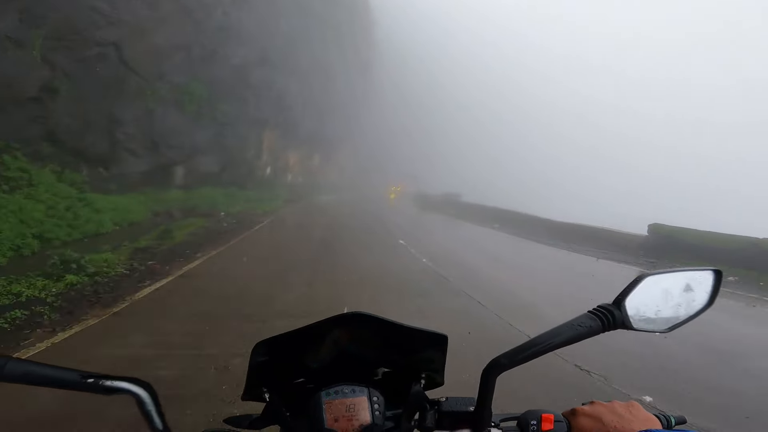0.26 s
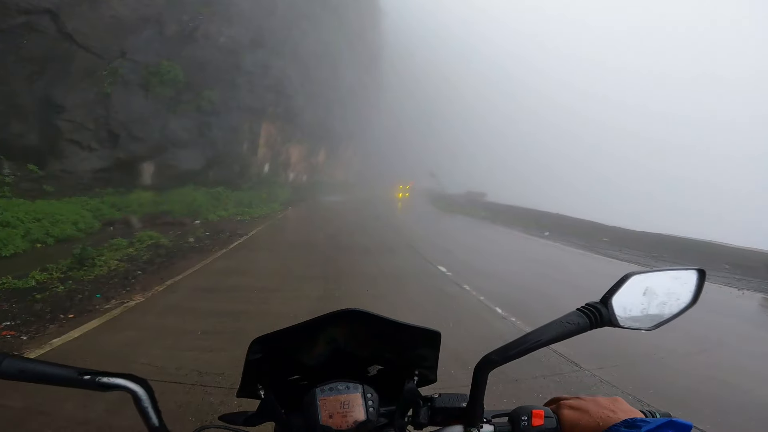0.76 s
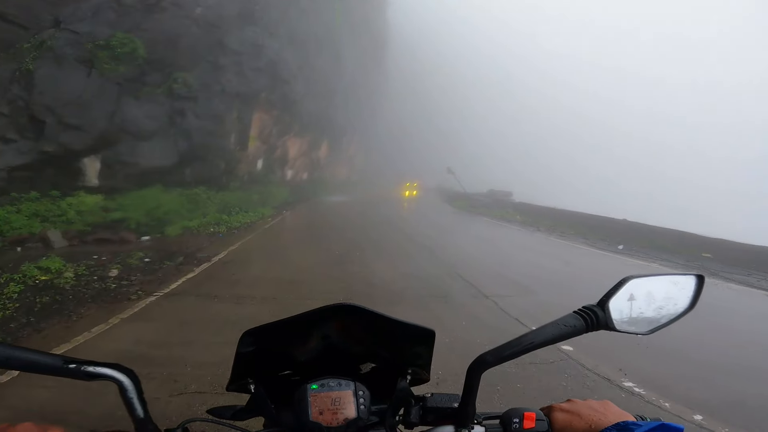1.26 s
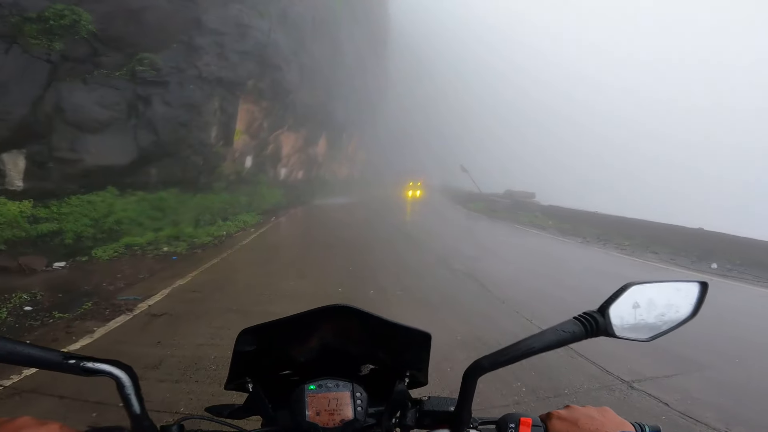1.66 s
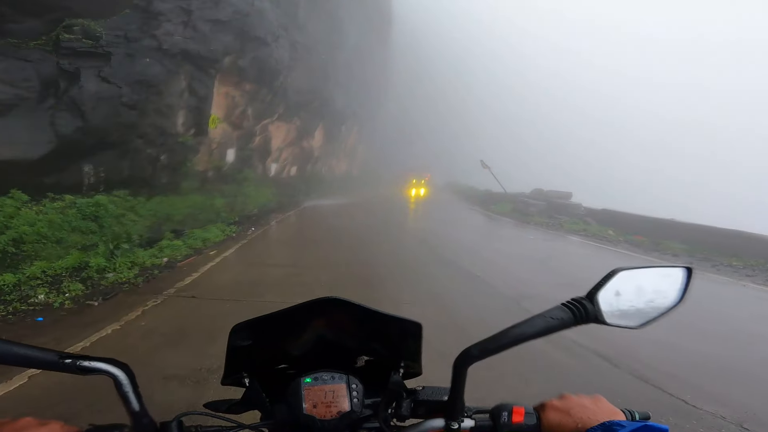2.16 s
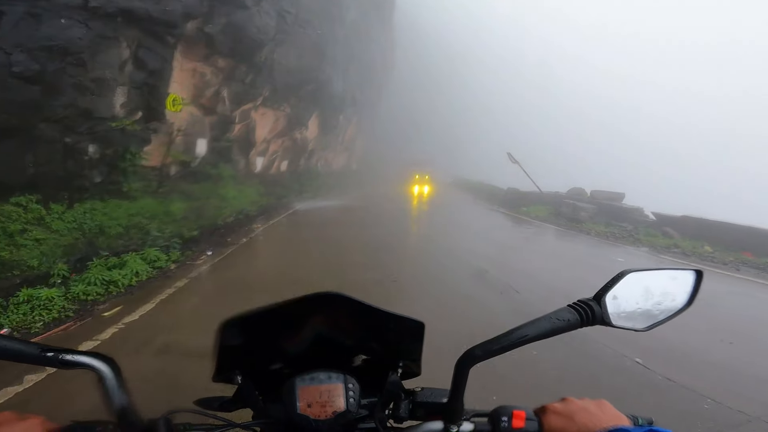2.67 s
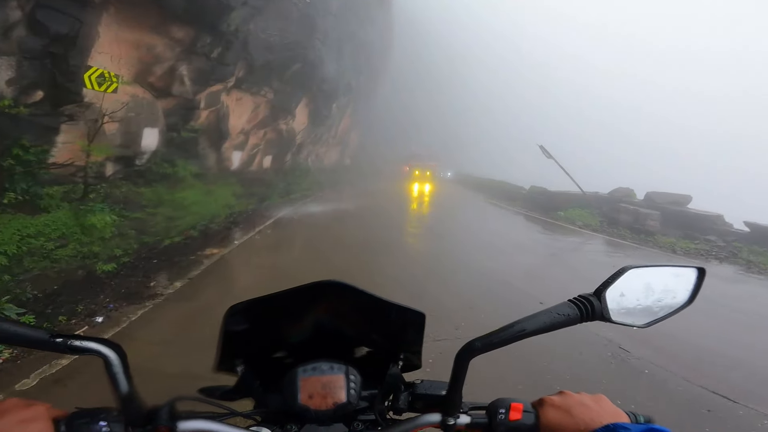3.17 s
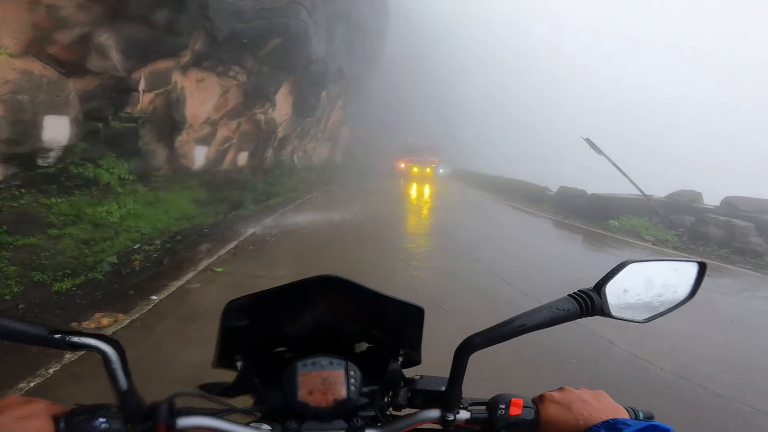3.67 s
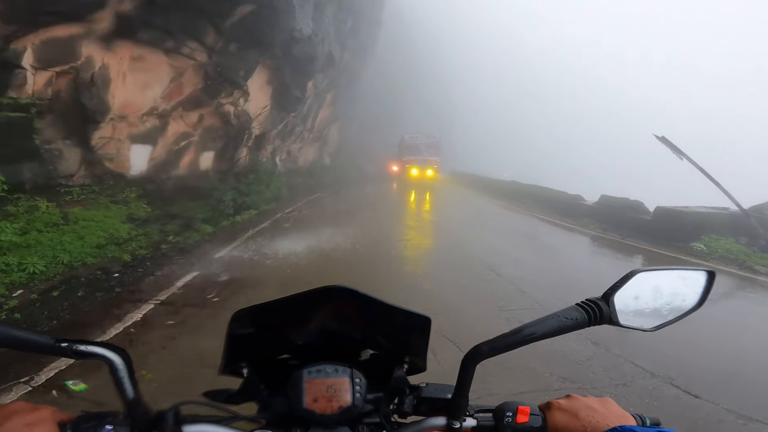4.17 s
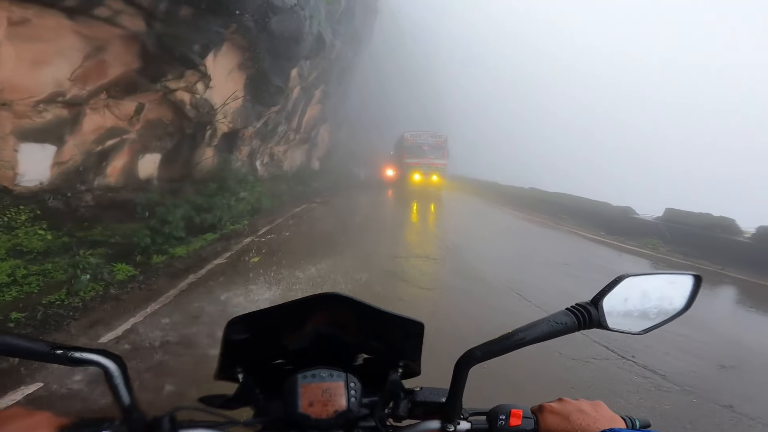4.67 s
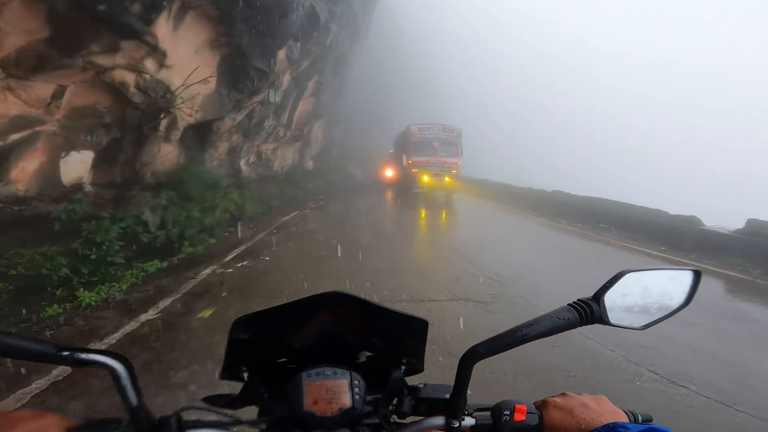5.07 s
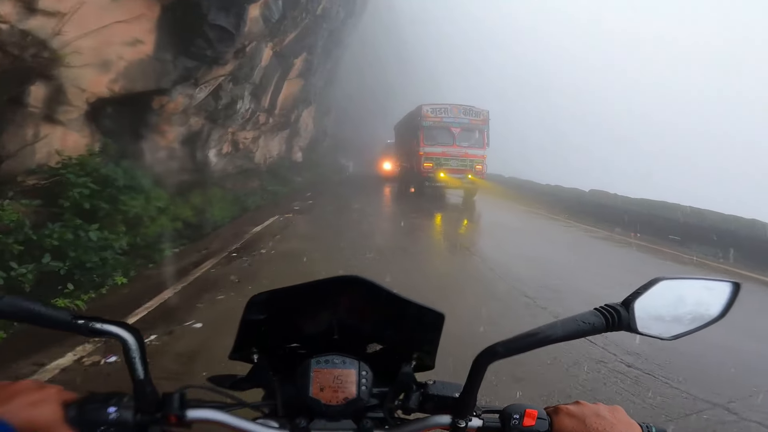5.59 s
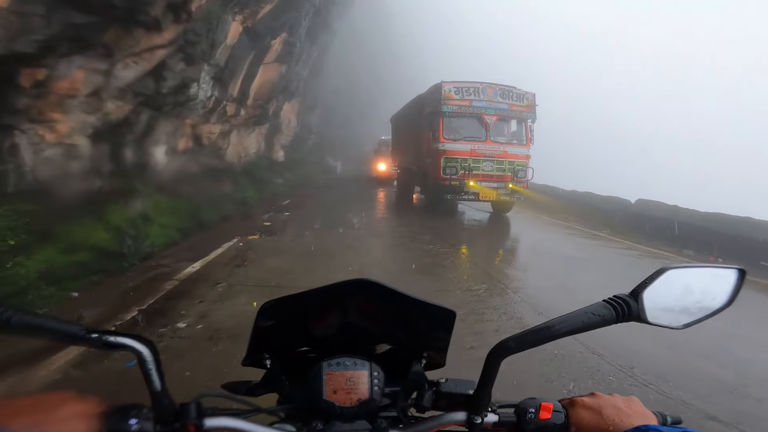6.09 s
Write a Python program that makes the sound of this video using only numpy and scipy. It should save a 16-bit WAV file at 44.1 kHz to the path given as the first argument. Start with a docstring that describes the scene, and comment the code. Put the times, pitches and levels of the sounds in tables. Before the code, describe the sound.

A single-cylinder motorcycle chugs near idle on a wet road in buffeting wind, water drops clatter on the camera, and an oncoming truck's growl swells.

```python
"""A wet road under a dripping rock face, heard from the camera of a motorcyclist rolling near idle.
Each firing of the single cylinder rings the exhaust, and wind buffets the two microphone ports.
Filtered noise makes the tyres and the falling water, which hisses nearer until it is passed; its drops
ring the camera housing. A far reed horn beeps twice, the first beep with a softer lead-in, and the growl
and rush of an oncoming truck swell. A thin high whistle comes and goes."""
import sys
import numpy as np
from scipy import signal
from scipy.fft import rfft, irfft, next_fast_len
from scipy.io import wavfile
from scipy.ndimage import uniform_filter1d, map_coordinates

SR = 44100
rng = np.random.default_rng(int(sys.argv[2]) if len(sys.argv) > 2 else 0)


def decibels_to_gain(level_db):
    """Convert a level in decibels to a linear amplitude gain (20 dB per decade)."""
    exponent = np.asarray(level_db, float) / 20
    return 10 ** exponent


def dump_mix(stems):
    """Bounce the given channels to the path in sys.argv[1] as a 16-bit WAV at rate SR."""
    frames = np.atleast_2d(stems).T  # one column per channel
    limited = np.clip(frames, -1, 1)  # hard clip at full scale
    pcm = np.round(limited * 32767).astype(np.int16)
    wavfile.write(sys.argv[1], SR, pcm)


N = 279594  # samples

# The two microphone ports. Each row: frequency in Hz, left-right correlation from 0 to 1.
PORT_LIKENESS = [(100, 1), (520, 1), (890, 0.92), (1500, 0.55), (2600, 0.2), (8000, 0.1)]
WIND_LIKENESS = [(20, .95), (100, .92)]
# Balance of the ports. Each row: frequency in Hz, left over right in dB.
PORT_BALANCE = [(60, 1.5), (150, -1), (390, 0), (1010, 2), (2600, 2.5)]
PORT_LAG_S = 1.25e-4  # the right port hears a little later

# Far horn. Each row: start in seconds, time held in seconds, level in dB.
HORN_BEEPS = [(3.8, .05, -40), (3.86, .1, -32), (4.04, .065, -32.5)]
# Horn overtones; a second, lower trumpet gives the multiple between.
# Each row: multiple of the pitch, level in dB.
HORN_OVERTONES = [(1, -5), (2, 0), (2.53, -10), (3, -8), (4, -11), (5, -26), (6, -24), (8, -24)]
HORN_HZ, HORN_ATTACK_S, HORN_DROP_DB_PER_S = 489.5, .012, 170

# Thin whistle before its random wavering. Each row: time in seconds, rms level in dB.
WHISTLE_LEVEL = [(.3, -82), (.36, -69), (.46, -62), (.54, -74), (.66, -66), (.76, -73), (1, -70),
                 (1.08, -74), (1.22, -64), (1.35, -68), (1.42, -78), (1.65, -78), (1.8, -67), (1.9, -68),
                 (2, -61), (2.08, -69), (2.25, -78), (4.2, -76), (4.5, -90)]
WHISTLE_HZ = 11312

# Oncoming truck's body resonances. Each row: centre in Hz, width in Hz, level in dB.
TRUCK_RESONANCES = [(112.7, 32, 1.5), (328, 63, -0.5), (465, 93, -5), (811, 65, -7)]
TRUCK_PASS_S, CLOSING_M_PER_S, TRUCK_SIDE_M = 6.91, 6.87, 13.6
TRUCK_FIRINGS_HZ = 46.84  # mean rate
TRUCK_GROWL_DB, TRUCK_ROAR_DB, TRUCK_RUSH_DB = -24, -13.5, -29.5  # as heard from 10 m
FADE_DB = 4  # how deep the resonances fade

# Spectra of the road's roar and rush. Each row: frequency in Hz, relative density in dB.
ROAR_SPECTRUM = [(40, -12), (80, 0.5), (200, -6.5), (450, -5), (700, -8), (1000, -16), (1400, -24),
                 (2500, -68), (5000, -130)]
RUSH_SPECTRUM = [(500, -12), (1000, 5), (1500, 1.5), (2000, -2), (2600, -8), (3400, -15), (4500, -20),
                 (7000, -21), (10000, -120)]
OWN_ROAR_DB = -33.5  # the bike's own tyres
PUDDLE_S, PUDDLE_WIDTH_S, PUDDLE_DB = 5.9, 0.78, -33  # the tyres cross the water lying under the fall

# Wind on the camera. Each row: time in seconds, slow surge level in dB, eddy level in dB.
WIND_LEVELS = [(0, -7.5, -20.5), (.3, -14.5, -26), (.7, -11.5, -25.5), (.95, -13.5, -40),
               (1.55, -10.5, -34.5), (2, -12.5, -30.5), (2.4, -13.5, -18), (2.7, -10.5, -24.5),
               (3.1, -13, -17.5), (3.4, -12.5, -25.5), (4, -15, -18.5), (4.65, -14, -25), (5.05, -11, -24),
               (5.5, -14, -38), (5.9, -19.5, -19.5), (6.34, -17, -19)]
# Spectra of surge (before it flattens) and eddies. Each row: frequency in Hz, relative density in dB.
SURGE_SPECTRUM = [(1, 0), (4, -3.5), (15, -12.5), (35, -10.5), (44, -13.5), (70, -44), (140, -140)]
EDDY_SPECTRUM = [(20, -29), (50, 4), (75, 6.5), (120, -0.5), (200, -6.5), (400, -10.5), (800, -51),
                 (1600, -140)]

# Spectra of the falling water, body and finest part. Each row: frequency in Hz, relative density in dB.
HISS_SPECTRUM = [(2500, 4), (4000, -15), (5500, -3), (7000, 2.5), (9000, 2.5), (11000, -5.5), (13000, -28),
                 (15500, -40), (17000, -120)]
FIZZ_SPECTRUM = [(7000, -25), (10500, 1), (12000, 0), (13500, -4), (15500, -11), (17000, -30)]
STRAY_SPECTRUM = [(3000, -30), (5000, 0), (8000, 1), (12000, -5), (16000, -25)]
FALL_PASS_S, BIKE_M_PER_S, FALL_SIDE_M = 5.41, 4.6, 6.2
HISS_DB, FIZZ_DB = -46, -57.5  # as heard from 10 m
MIST_DB_PER_M = 0.3  # fizz lost with distance beyond spreading
BEHIND_DB, TURN_S = -1, 0.044  # softer once it lies behind the rider
FALL_LEFT_DB = 4.5  # lean to each side at the nearest distance, before it falls behind
SHOWER_S, SHOWER_END_S, SHOWER_EDGE_S = 4.95, 5.45, .2  # riding through the thrown spray
SHOWER_FIZZ_DB = 6  # for a fully open shower

# Drops on the housing, relative levels.
# Each row: start in seconds, knock in dB, crack in dB, tick in dB, ring in Hz.
HOUSING_DROPS = [(0.5175, -31.5, -36, -38, 1980), (1.4142, -33, -58, -62, 1800),
                 (1.595, -23, -37, -48, 1350), (2.068, -25, -47, -50, 1310), (2.358, -47, -40, -56, 1400),
                 (2.481, -38, -44, -56, 1400), (2.544, -46, -35, -48, 1400),
                 (5.2331, -7.5, -16.5, -25, 1250), (5.2397, -10, -42, -40, 980),
                 (5.265, -19, -39, -44, 1310), (5.3078, -15, -46, -44, 1280), (5.3468, -22, -44, -46, 1270),
                 (5.3573, -16, -44, -46, 1280), (5.3843, -26, -44, -48, 1900),
                 (5.404, -8.5, -57, -31, 1840), (5.4107, -10, -31, -42, 1310),
                 (5.4212, -13.5, -28, -44, 1380), (5.454, -13, -42, -47, 1270),
                 (5.4576, -15, -40, -48, 1330), (5.484, -10, -36, -42, 1210), (5.5043, -6, -6.5, -35, 1660),
                 (5.507, -17, -30, -40, 1690), (5.54, -18, -25, -26, 2000), (5.5545, -15, -27, -29, 1350),
                 (5.5657, -13, -28, -36, 1500), (5.5747, -16.5, -38, -42, 1300),
                 (5.5898, -13, -21, -28, 1320), (5.6057, -16, -23, -32, 1390),
                 (5.617, -29, -19, -21.5, 1800), (5.6338, -12, -38, -28, 1490),
                 (5.647, -18, -24, -33, 1410), (5.6517, -11.5, -30, -24, 1440),
                 (5.6685, -35, -44, -29, 1400), (5.698, -15.5, -40, -46, 1410), (5.72, -16, -36, -32, 1340),
                 (5.7262, -13, -34, -32, 1370), (5.732, -17, -38, -32, 1200), (5.7419, -14, -31, -33, 1390),
                 (5.752, -35, -39, -26, 1390), (5.7827, -20, -29, -28, 1280), (5.7898, -30, -25, -22, 1900),
                 (5.8292, -19, -29, -35, 1410), (5.8373, -13, -33, -36, 1360),
                 (5.8463, -18, -43, -35, 1310), (5.8707, -23, -40, -38, 1400), (5.914, -25, -35, -37, 1500),
                 (5.933, -21, -33, -30, 1850), (5.9464, -15, -38, -44, 1430),
                 (5.9716, -22.5, -34, -40, 1920), (6.0287, -30, -27, -30, 1380),
                 (6.1084, -28, -34, -44, 1400)]
# Modes of the housing. Each row: multiple of the ring pitch, gain in dB, decay by 60 dB in seconds.
HOUSING_MODES = [(0.98, 5, 0.013), (0.593, 4.5, 0.0083), (1.366, 1.5, 0.0076), (1.8, -11, 0.012),
                 (0.372, -3.5, 0.014)]
SPREAD_S = .0005  # a drop flattens out, so its modes do not all start at once
# Small splashes under the fall, before random scatter. Each row: time in seconds, level in dB.
SPLASH_LEVEL = [(5.15, -34), (5.27, -37), (5.45, -40), (5.58, -30.5), (5.85, -26.5), (6.05, -38),
                (6.34, -30.5)]
# Droplets of spray ticking close on the left. Each row: start in seconds, level in dB.
LEFT_DROPLETS = [(2.109, -40), (2.138, -43), (2.566, -44), (4.0005, -29), (5.016, -25), (5.0871, -30),
                 (5.0992, -25), (5.143, -26), (5.216, -28), (5.2465, -24), (5.4276, -28), (5.5209, -40)]
# Spectra of crack, tick and droplet. Each row: frequency in Hz, relative density in dB.
CRACK_SPECTRUM = [(1500, -17), (3000, 0), (3800, -5), (4500, -1), (5200, -10.5), (6000, -15.0),
                  (8000, -12.5), (12000, -44)]
TICK_SPECTRUM = [(4500, -32), (6500, -0.5), (8500, -2.5), (11000, -3.0), (14000, -8), (16000, -18)]
DROPLET_SPECTRUM = [(5000, -30), (7500, 0), (10500, 2), (13500, -16), (16000, -30)]

# Exhaust pipe and silencer resonances. Each row: centre in Hz, width in Hz, gain in dB.
EXHAUST_RESONANCES = [(105, 62, 40.7), (131, 12, 42), (150, 146, 39.5), (255, 62, 53.5), (303, 46, 46),
                      (370, 46, 53.5), (438, 65, 46), (548, 80, 49.5), (658, 85, 49.5)]
# Engine speed hunting around idle. Each row: time in seconds, firings a second.
ENGINE_SPEED = [(0.0, 16.42), (0.22, 16.39), (0.44, 16.92), (0.66, 16.38), (0.87, 16.55), (1.09, 16.28),
                (1.31, 16.14), (1.53, 16.59), (1.75, 17.05), (1.97, 16.14), (2.19, 16.08), (2.4, 16.32),
                (2.62, 16.57), (2.84, 16.69), (3.06, 16.67), (3.28, 16.2), (3.5, 16.38), (3.72, 16.36),
                (3.94, 16.24), (4.15, 16.29), (4.37, 16.74), (4.59, 15.41), (4.81, 16.27), (5.03, 16.77),
                (5.25, 16.45), (5.47, 16.22), (5.68, 16.39), (5.9, 15.94), (6.12, 15.98), (6.34, 16.35)]
# Level of the firings, which swells and dips. Each row: time in seconds, firing level in dB.
FIRING_LEVEL = [(0, 1.5), (.55, 0), (.85, -2.5), (1.55, 0), (1.9, 0.5), (2.4, 0.5), (2.8, -1), (3.15, 1),
                (3.4, -2), (3.9, 2.5), (4.9, 1.5), (5.6, -1.5), (6, 0), (6.34, -3)]
# Spectra of gas and bark. Each row: frequency in Hz, relative density in dB.
GAS_SPECTRUM = [(150, -9), (400, 3.5), (650, -6.5), (1000, -7.0), (1600, -29), (3000, -25.5),
                (6000, -54), (9000, -130)]
BARK_SPECTRUM = [(300, -25), (550, 0.5), (900, -5), (1400, -19), (2500, -70)]
FIRST_FIRING = .695  # cycles until the first firing
UNEVEN_DB, COLOUR_DB = .9, 1.2  # scatter between firings: of the whole, of each resonance
BARK_S, BARK_WIDTH_S = 0.01075, .0016  # delay after the firing, width
BARK_DB, GAS_DB = -29.5, -30.5


def unit(x):
    """Scale to rms 1."""
    return x / np.sqrt(np.mean(x ** 2) + 1e-20)


def along(points, hz):
    """Read (Hz, value) points on a log frequency axis."""
    f, v = np.transpose(points)
    return np.interp(np.log(hz + 1), np.log(f + 1), v)


def curves(rows):
    """One value per sample for each column after the time."""
    s, *cols = np.transpose(rows)
    return [np.interp(np.arange(N) / SR, s, c) for c in cols]


def wobble(rate):
    """A smooth random curve, rate knots a second."""
    knots = rng.standard_normal(int(N * rate / SR) + 4)
    return map_coordinates(knots, [np.arange(N) * rate / SR])


def soft_switch(at_s, edge_s):
    """A soft switch from 0 to 1."""
    return .5 + .5 * np.tanh((np.arange(N) / SR - at_s) / edge_s)


def passing(pass_s, speed, side_m):
    """Distance in metres of a thing passed at a steady speed, and its level in dB against that at 10 m."""
    metres = np.hypot(side_m, speed * (np.arange(N) / SR - pass_s))
    return metres, 20 * np.log10(10 / metres)


def filtered(x, response):
    """Multiply the spectrum of x by a complex response of frequency."""
    m = next_fast_len(N + 2 ** 13)
    return irfft(rfft(x, m) * response(np.fft.rfftfreq(m, 1 / SR)), m)[..., :N]


def resonance(f, centre, width):
    """Response of a damped resonator, 1 at its centre."""
    return 1j * f * width / (centre * centre - f * f + 1j * f * width)


def noise(spectrum, patchy_db, alike=PORT_LIKENESS):
    """Stereo noise of rms 1 with random patches of gain, correlated at the ports as alike tells."""
    z = signal.stft(rng.standard_normal((2, N + 2 ** 10)), nperseg=512)[2]
    field = uniform_filter1d(rng.standard_normal(z.shape[1:]), size=8, axis=0)
    field = uniform_filter1d(field, size=6, axis=1)
    pair = signal.istft(z * decibels_to_gain(patchy_db * unit(field)), nperseg=512)[1][:, :N]

    def mid_side(hz):
        turn = np.arccos(np.clip(along(alike, hz), 0, 1)) / 2
        return decibels_to_gain(along(spectrum, hz)) * [np.cos(turn), np.sin(turn)]

    mid, side = filtered(pair, mid_side)
    return unit(np.array([mid + side, mid - side]))


def struck(times, size, ring_hz, ring_t60, length):
    """Damped sines with a soft wet start, summed; one row per blow."""
    t = np.arange(length) / SR
    shape = decibels_to_gain(-60 * t / ring_t60) * (1 - np.exp(-t / .00035))
    rows = size[:, None] * shape * np.sin(2 * np.pi * ring_hz[:, None] * t)
    at = np.round(times * SR).astype(int)[:, None] + np.arange(length)
    return np.bincount(at.ravel(), rows.ravel(), N + SR)[:N]


def burst(times, size, t60, spectrum):
    """Short decaying puffs of coloured noise, nearly unrelated at the two ports."""
    marks = np.bincount(np.round(times * SR).astype(int) % N, size, N)
    envelope = signal.fftconvolve(marks, decibels_to_gain(-60 * np.arange(900) / SR / t60))[:N]
    return envelope * noise(spectrum, 0.72, [(4000, 0.057)])


def whistle():
    """A faint high sine, unsteady in pitch and level."""
    db = np.interp(np.arange(N) / SR, *np.transpose(WHISTLE_LEVEL), right=-120)
    turn = 2 * np.pi * np.cumsum(WHISTLE_HZ + 10 * wobble(40)) / SR
    return np.sqrt(2) * decibels_to_gain(db + 1.3 * wobble(22)) * np.sin(turn)


def horn():
    """A distant reed horn, smeared by the rock face: each beep rises, holds and trails off."""
    turn = 2 * np.pi * np.cumsum(HORN_HZ + 0.54 * wobble(30)) / SR
    tone = 0
    for k, db in HORN_OVERTONES:
        port_phase = np.array([[0], [0.27 * k]])
        tone = tone + decibels_to_gain(db + 2.8 * wobble(25.1)) * np.sin(k * turn + port_phase)
    t = np.arange(N) / SR
    beeps = 0
    for s, held, db in HORN_BEEPS:
        trail_db = HORN_DROP_DB_PER_S * np.maximum(t - s - held, 0)
        beeps = beeps + soft_switch(s, HORN_ATTACK_S) * decibels_to_gain(db - trail_db)
    return beeps * tone


def truck():
    """Uneven diesel firings ring the body; its resonances fade as the path off the rock changes."""
    cycles = np.cumsum(TRUCK_FIRINGS_HZ + 1.5 * wobble(12)) / SR
    at = np.flatnonzero(np.diff(np.floor(cycles)))
    pulses = np.zeros(N)
    pulses[at] = decibels_to_gain(3.2 * rng.standard_normal(len(at)))
    growl = 0
    for centre, width, db in TRUCK_RESONANCES:
        ring = unit(filtered(pulses, lambda f: resonance(f, centre, width) ** 2))
        growl = growl + decibels_to_gain(db + FADE_DB * wobble(6.4)) * ring
    near_db = passing(TRUCK_PASS_S, CLOSING_M_PER_S, TRUCK_SIDE_M)[1]
    return decibels_to_gain(TRUCK_GROWL_DB + 1.92 * near_db) * growl  # swells faster than by spreading alone


def road():
    """Tyres on wet tar and the truck: a roar and a brighter rush of noise, both gusting a little."""
    truck_db = passing(TRUCK_PASS_S, CLOSING_M_PER_S, TRUCK_SIDE_M)[1]
    puddle_time = (np.arange(N) / SR - PUDDLE_S) / PUDDLE_WIDTH_S
    puddle = decibels_to_gain(PUDDLE_DB) * np.exp(-.5 * puddle_time ** 2)
    roar_size = np.hypot(decibels_to_gain(OWN_ROAR_DB), decibels_to_gain(TRUCK_ROAR_DB + truck_db))
    rush_size = np.hypot(decibels_to_gain(TRUCK_RUSH_DB + truck_db), puddle)
    gust = wobble(4.8)
    roar = roar_size * decibels_to_gain(.4 * gust + .8 * wobble(20)) * noise(ROAR_SPECTRUM, patchy_db=1.0)
    rush = rush_size * decibels_to_gain(.9 * gust + wobble(25)) * noise(RUSH_SPECTRUM, patchy_db=0.5)
    return roar + rush


def wind():
    """Slow pressure surges flatten out as the membrane nears its stop; faster eddies buffet on top."""
    surge_db, eddy_db = curves(WIND_LEVELS)
    flattened = np.tanh(0.66 * noise(SURGE_SPECTRUM, .1, WIND_LIKENESS))
    surge = unit(filtered(flattened, lambda hz: (hz > 1) / (1 + (hz / 52) ** 6)))
    eddies = noise(EDDY_SPECTRUM, 0.91, WIND_LIKENESS)
    return decibels_to_gain(surge_db + 0.64 * wobble(9.8)) * surge + decibels_to_gain(eddy_db + 0.88 * wobble(7.8)) * eddies


def spray():
    """Falling water on the left hisses and flickers as sheets land; mist hides its fizz until near."""
    metres, near_db = passing(FALL_PASS_S, BIKE_M_PER_S, FALL_SIDE_M)
    behind = soft_switch(FALL_PASS_S + TURN_S, TURN_S)
    hiss_db = HISS_DB + near_db + BEHIND_DB * behind
    shower = soft_switch(SHOWER_S, SHOWER_EDGE_S) - soft_switch(SHOWER_END_S, SHOWER_EDGE_S)
    fizz_db = FIZZ_DB + near_db - MIST_DB_PER_M * (metres - 10) + SHOWER_FIZZ_DB * shower
    luck = rng.random((250, 2))  # stray drops stand out of the hiss as tiny ticks
    stray_size = decibels_to_gain(-4 * np.log(luck[:, 1] + 0.018))
    ticks = burst(luck[:, 0] * N / SR, stray_size, 0.0072, STRAY_SPECTRUM)
    water = decibels_to_gain(hiss_db) * (ticks + noise(HISS_SPECTRUM, patchy_db=1.5))
    water = water + decibels_to_gain(fizz_db) * noise(FIZZ_SPECTRUM, patchy_db=1.2)
    flicker_db = .5 * wobble(9) + 1.2 * wobble(40)
    lean_db = FALL_LEFT_DB * FALL_SIDE_M / metres * (1 - 0.52 * behind)
    return decibels_to_gain(flicker_db) * water * decibels_to_gain(lean_db * [[1], [-1]])


def drops():
    """Drops slap the housing, which rings briefly, and split with a crack and tick amid small splashes."""
    s, db, crack_db, tick_db, hz = np.transpose(HOUSING_DROPS)
    count = len(s)
    lates = rng.exponential(SPREAD_S, (len(HOUSING_MODES), count))
    signs = rng.choice([-1, 1], (len(HOUSING_MODES), count))

    def ring():
        total = 0
        for (ratio, gain_db, t60), late, sign in zip(HOUSING_MODES, lates, signs):
            size = sign * decibels_to_gain(db + gain_db + rng.normal(0, 2.5, count))
            mode_hz = hz * ratio * rng.normal(1, .03, count)
            total = total + struck(s + late, size, mode_hz, t60, length=900)
        return total

    knock = np.array([ring(), ring()])  # the housing rings a little differently at each port

    luck = rng.random((2, 1600, 3))  # each port catches its own splashes
    first_s = SPLASH_LEVEL[0][0]
    times = first_s + luck[..., 0] * (N / SR - first_s)
    under = s[s > first_s]  # half of them spatter just after a big drop
    chosen = (luck[:, ::2, 0] * len(under)).astype(int)
    times[:, ::2] = under[chosen] + rng.exponential(0.012, (2, 800))
    size = decibels_to_gain(np.interp(times, *np.transpose(SPLASH_LEVEL)) - 4 * np.log(luck[..., 1] + .02))
    splash_hz = 700 * 4.56 ** luck[..., 2]
    patter = np.array([struck(*port, 0.0063, length=500) for port in zip(times, size, splash_hz)])

    # some of the splashes crack and tick too
    crack_size = np.append(decibels_to_gain(crack_db), decibels_to_gain(-16.5) * size[0, :300])
    crack = burst(np.append(s, times[0, :300]), crack_size, 0.0096, CRACK_SPECTRUM)
    tick_size = np.append(decibels_to_gain(tick_db), decibels_to_gain(-26.0) * size[1, :300])
    tick = burst(np.append(s, times[1, :300]), tick_size, 0.0064, TICK_SPECTRUM)
    near_s, near_db = np.transpose(LEFT_DROPLETS)
    droplets = burst(near_s, decibels_to_gain(near_db), 0.0084, DROPLET_SPECTRUM)
    slaps = knock * decibels_to_gain([[1.2], [-1.2]]) + patter
    return slaps + crack * decibels_to_gain([[-4], [3]]) + tick * decibels_to_gain([[-2], [2]]) + droplets * decibels_to_gain([[3], [-5]])


def engine():
    """Each firing sucks a soft pulse through the pipe, then barks and puffs a burst of turbulent gas."""
    cycles = np.cumsum(curves(ENGINE_SPEED)[0]) / SR - FIRST_FIRING
    at = np.flatnonzero(np.diff(np.floor(cycles)))
    pulses = np.zeros(N)
    pulses[at] = decibels_to_gain(curves(FIRING_LEVEL)[0][at] + UNEVEN_DB * rng.standard_normal(len(at)))

    def pipe(f, centre, width):
        # two chambers in a row: every resonance acts twice, so the ring swells before it dies
        valve = 1 / (1 + 1j * f / 139) ** 2  # softens the pulse
        return -resonance(f, centre, width) ** 2 * valve

    throb = 0
    for centre, width, gain_db in EXHAUST_RESONANCES:
        coloured = pulses * decibels_to_gain(gain_db + COLOUR_DB * wobble(20))
        throb = throb + filtered(coloured, lambda f: pipe(f, centre, width))

    t = np.arange(SR // 20) / SR
    puff = signal.fftconvolve(pulses, t / 0.0076 * np.exp(1 - t / 0.0084))[:N]
    gas = decibels_to_gain(GAS_DB) * puff * noise(GAS_SPECTRUM, patchy_db=1.0)
    # a short bark as the pressure front leaves the tailpipe
    front = np.exp(-.5 * ((t - BARK_S) / BARK_WIDTH_S) ** 2)
    snap = signal.fftconvolve(pulses * decibels_to_gain(2.5 * wobble(20)), front)[:N]
    bark = decibels_to_gain(BARK_DB) * snap * noise(BARK_SPECTRUM, patchy_db=0.0)
    return throb + bark + gas


def scene():
    """Engine, wind, road and truck lean as the ports do; water and tones keep their own side."""
    side = np.array([[.5], [-.5]])

    def ports(hz):
        return decibels_to_gain(side * along(PORT_BALANCE, hz)) * np.exp(2j * np.pi * hz * side * PORT_LAG_S)

    through_ports = filtered(truck() + road() + wind() + engine(), ports)
    return whistle() + horn() + spray() + drops() + through_ports


def top_cut(x):
    """Nothing passes above the cut-off."""
    return signal.sosfilt(signal.butter(12, 15800, fs=SR, output="sos"), x)


def record(dry):
    """The camera bends the loudest peaks over near full scale."""
    clipped = 1.03 * dry / (1 + np.abs(dry) ** 16) ** (1 / 16)
    return top_cut(clipped)


dry = scene()
out = record(dry)
dump_mix(out)
```